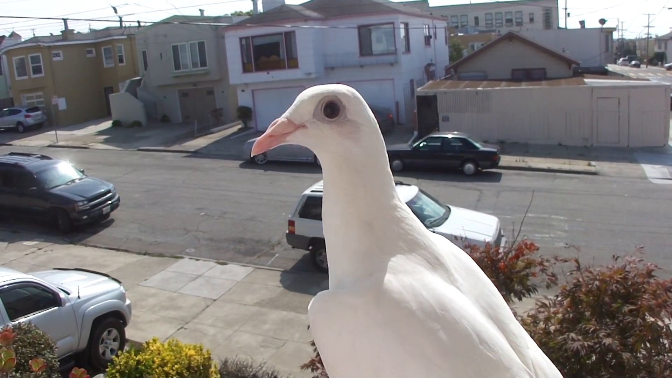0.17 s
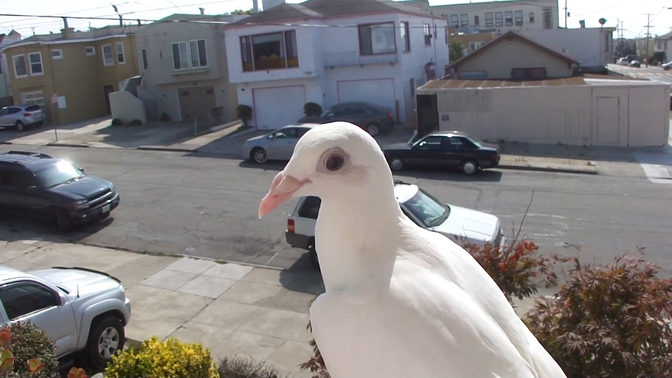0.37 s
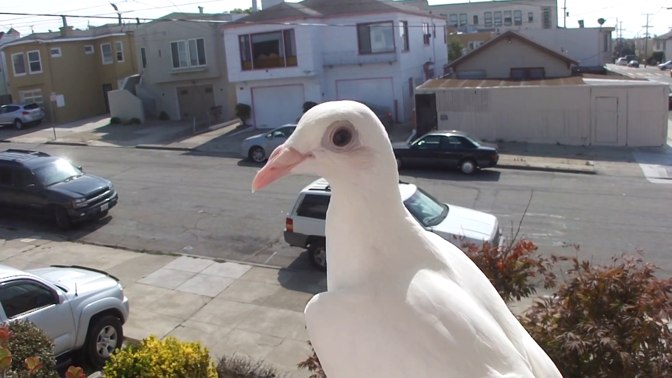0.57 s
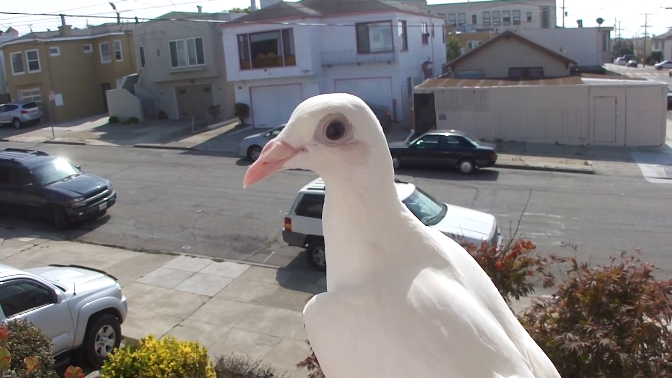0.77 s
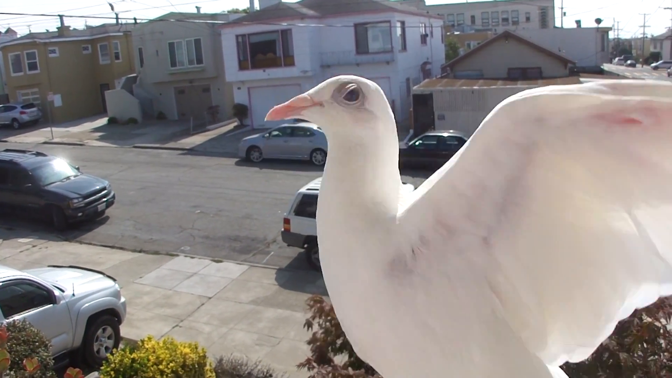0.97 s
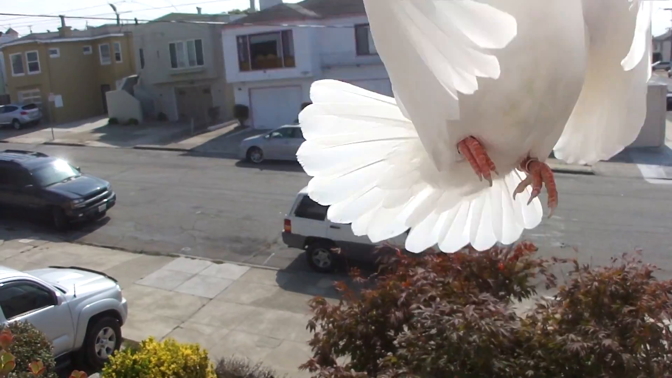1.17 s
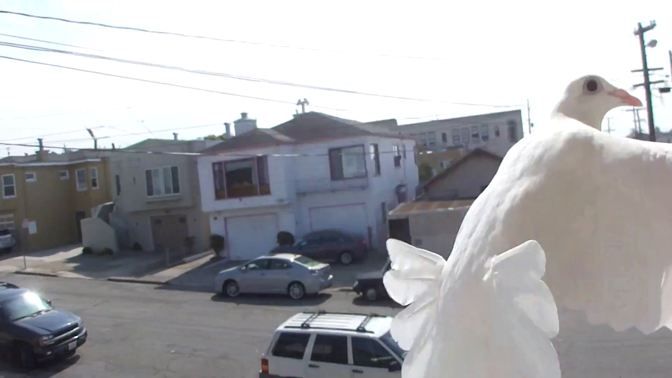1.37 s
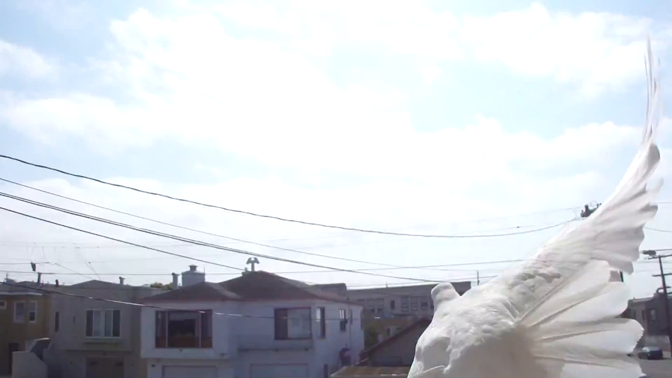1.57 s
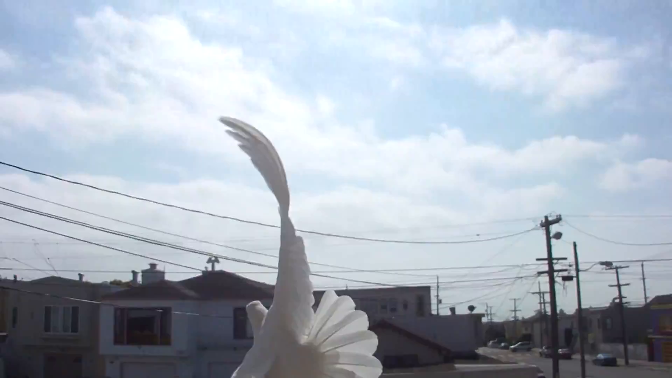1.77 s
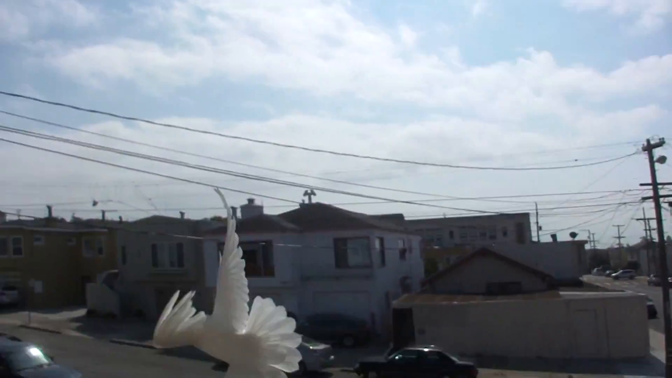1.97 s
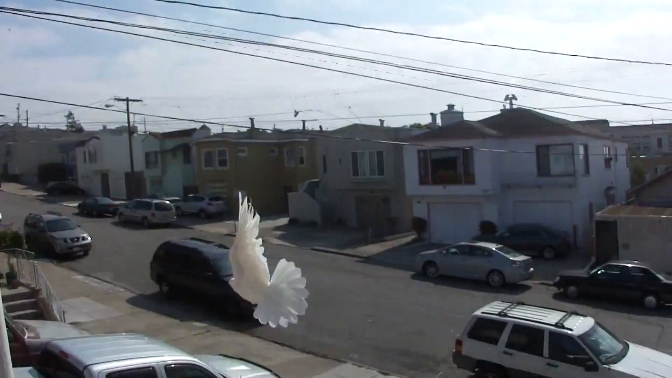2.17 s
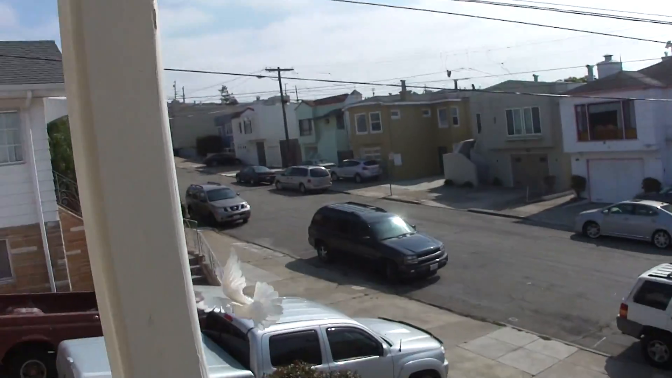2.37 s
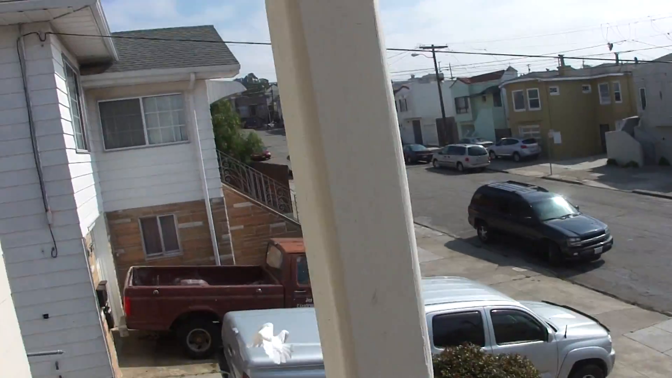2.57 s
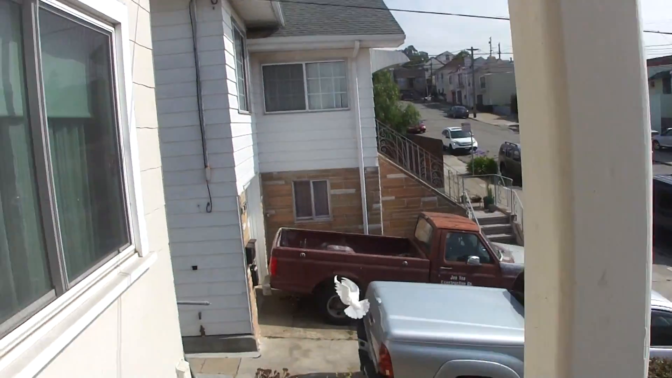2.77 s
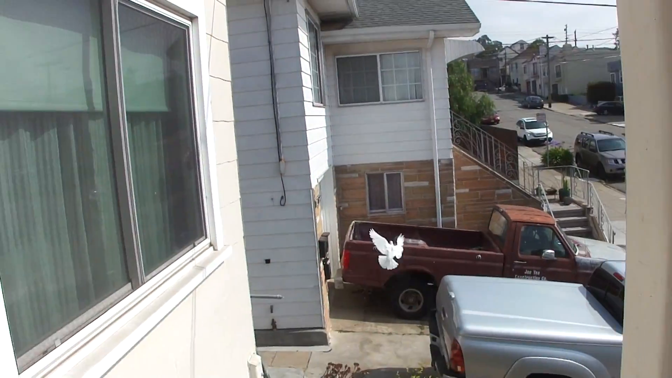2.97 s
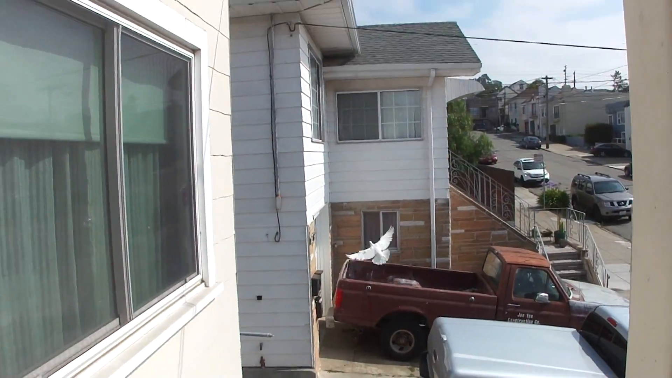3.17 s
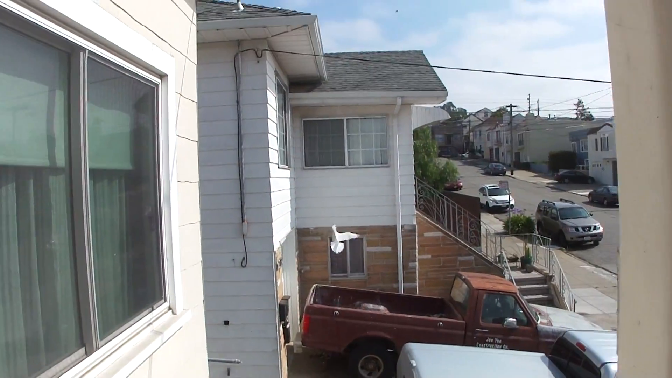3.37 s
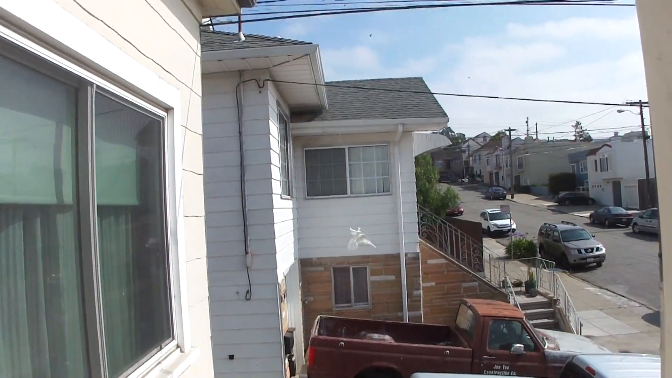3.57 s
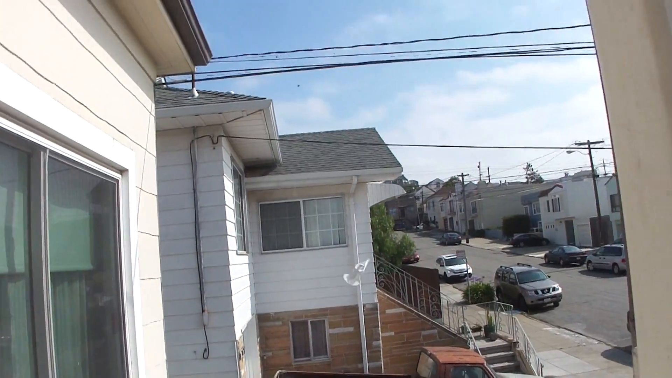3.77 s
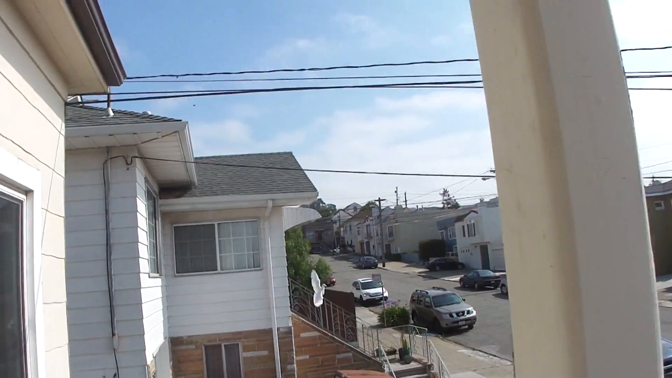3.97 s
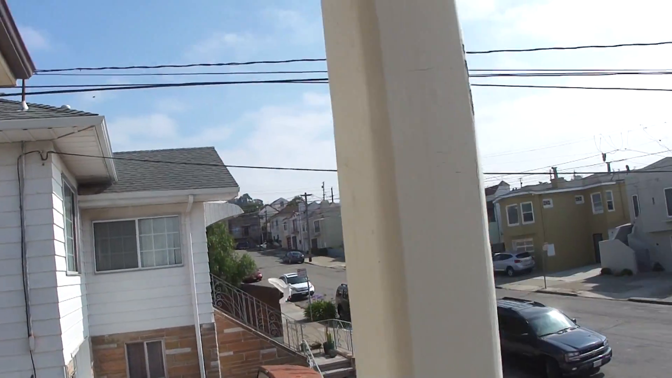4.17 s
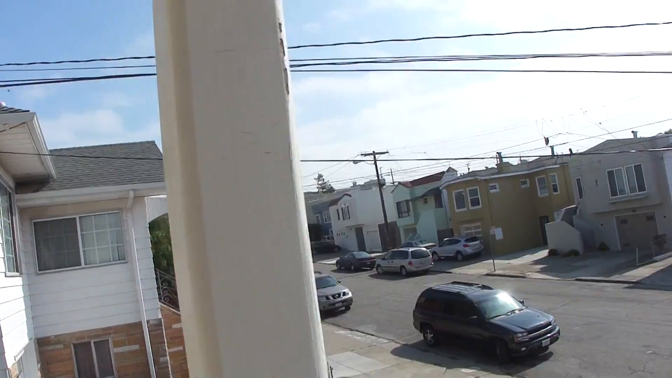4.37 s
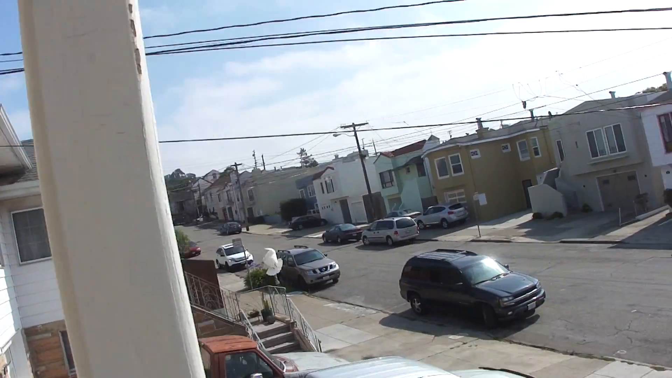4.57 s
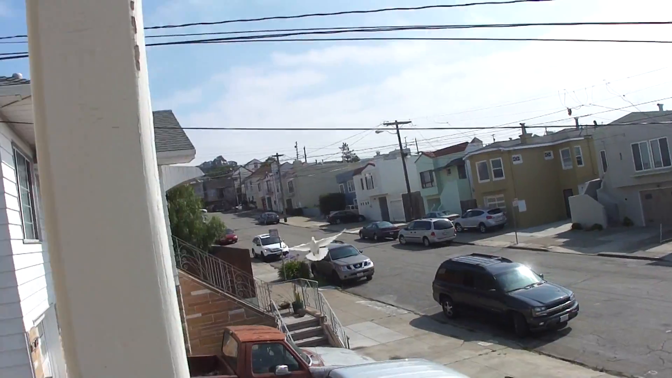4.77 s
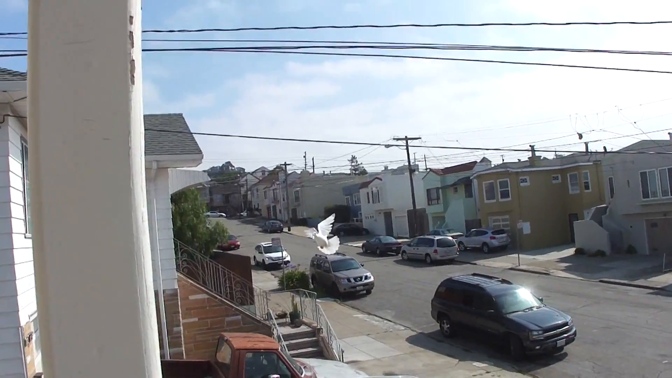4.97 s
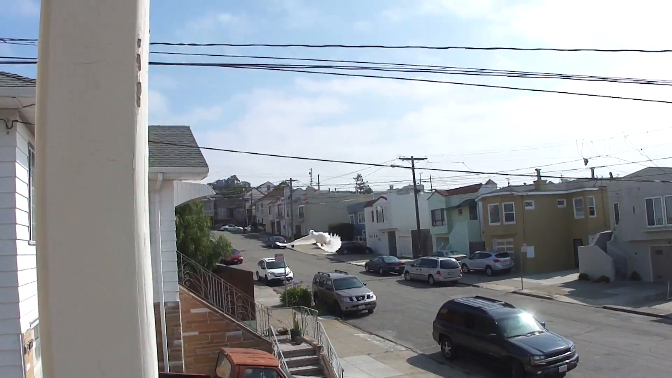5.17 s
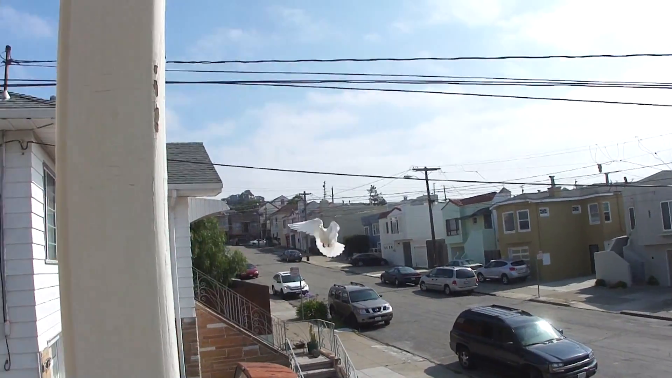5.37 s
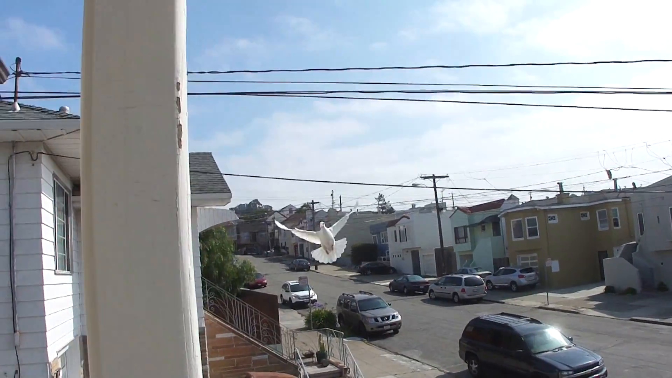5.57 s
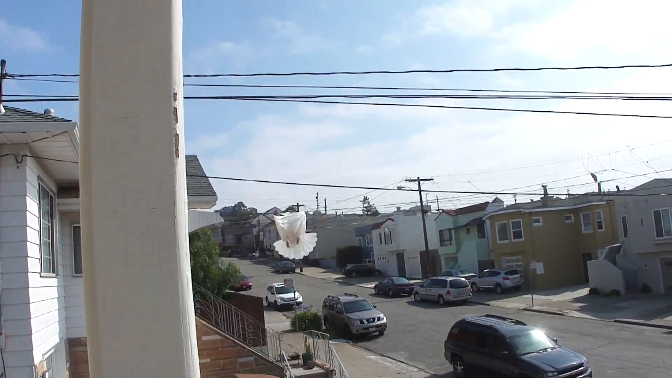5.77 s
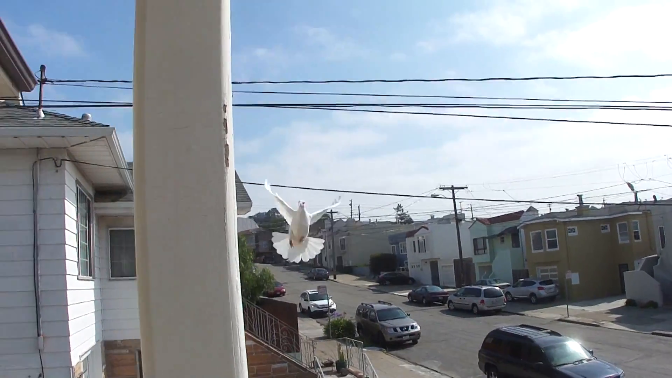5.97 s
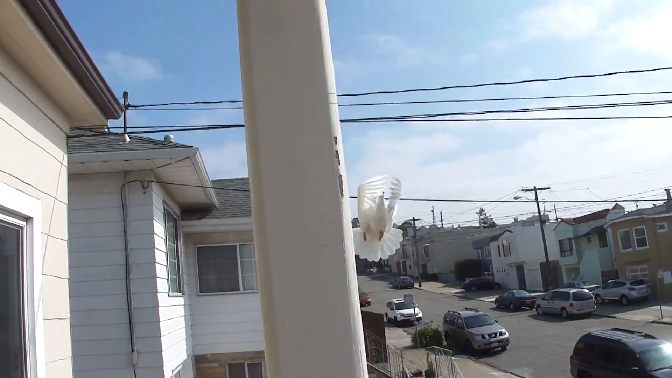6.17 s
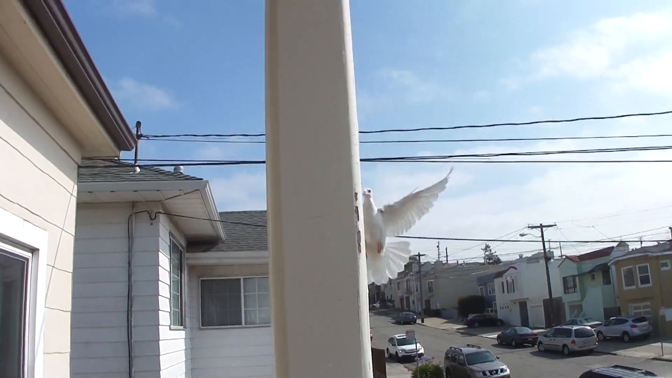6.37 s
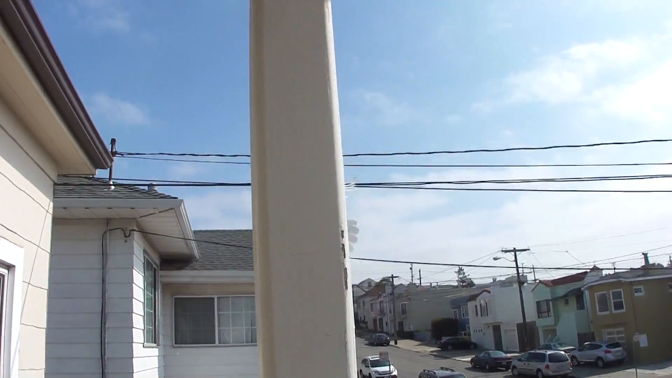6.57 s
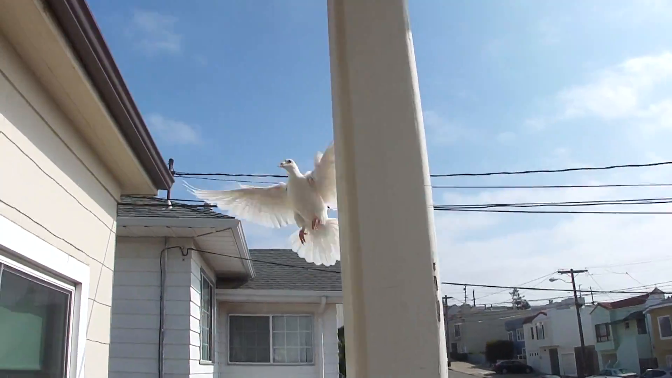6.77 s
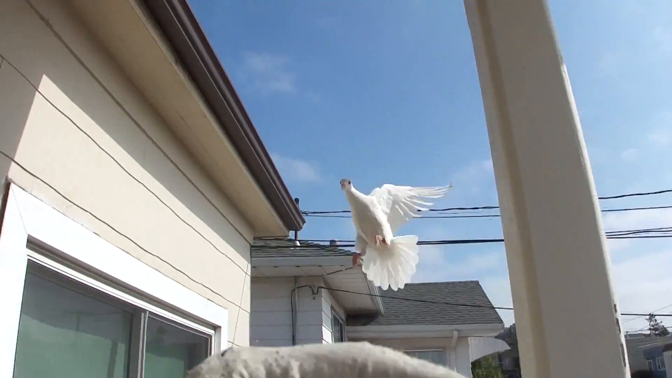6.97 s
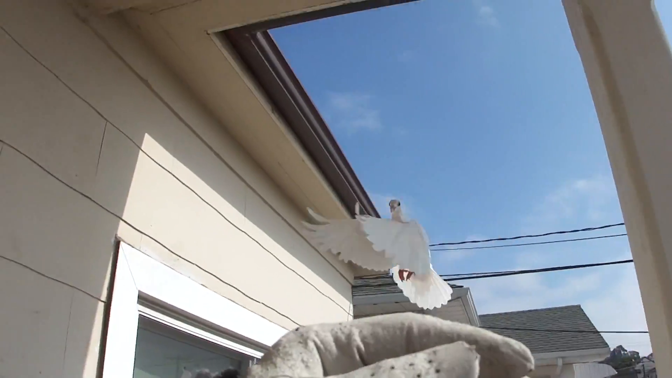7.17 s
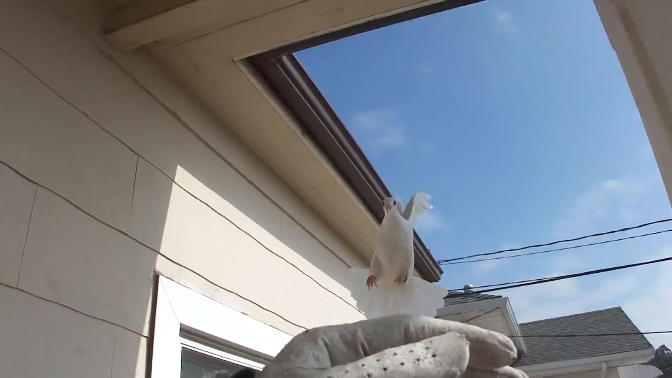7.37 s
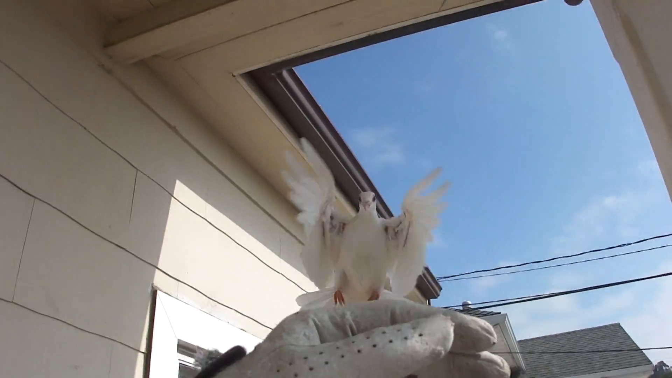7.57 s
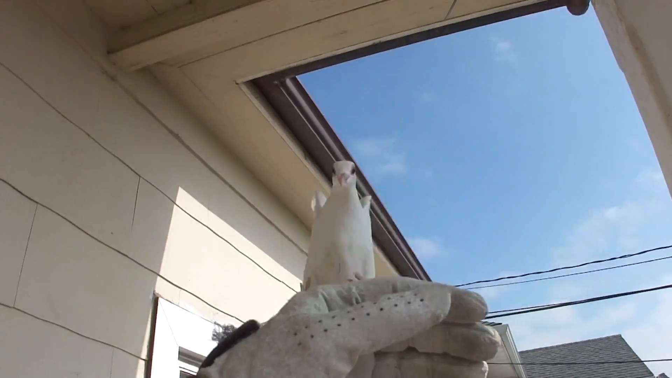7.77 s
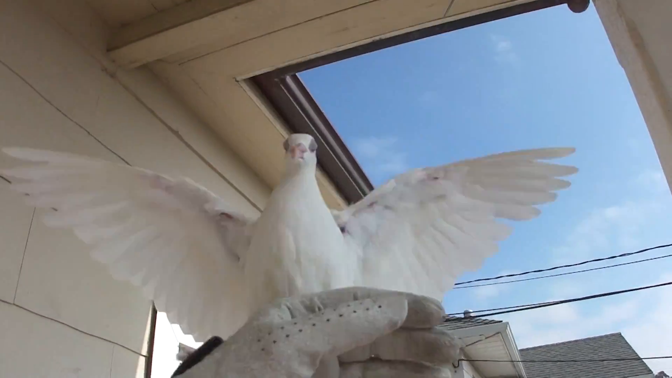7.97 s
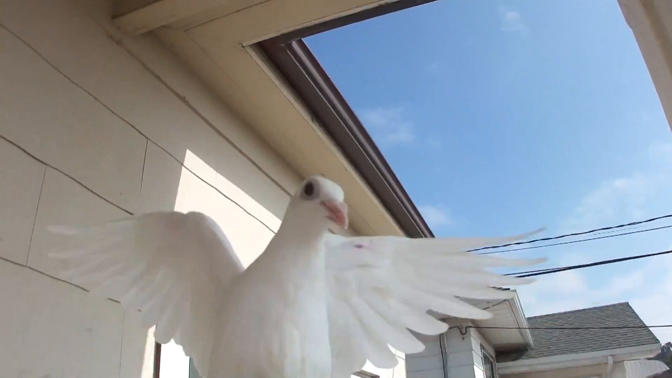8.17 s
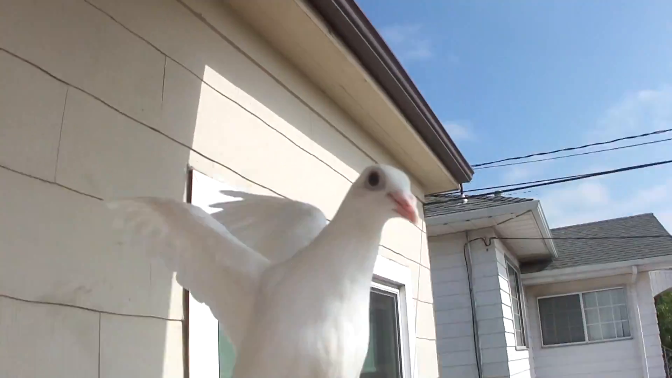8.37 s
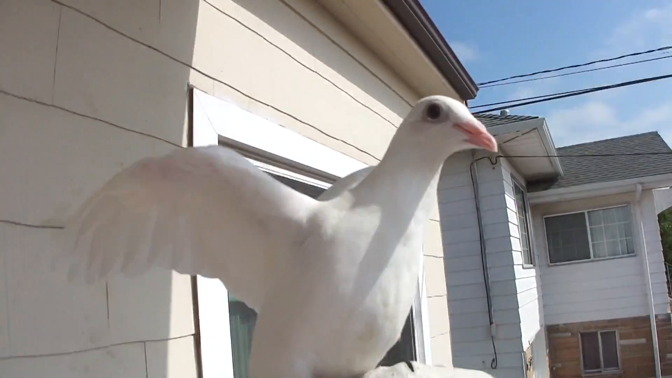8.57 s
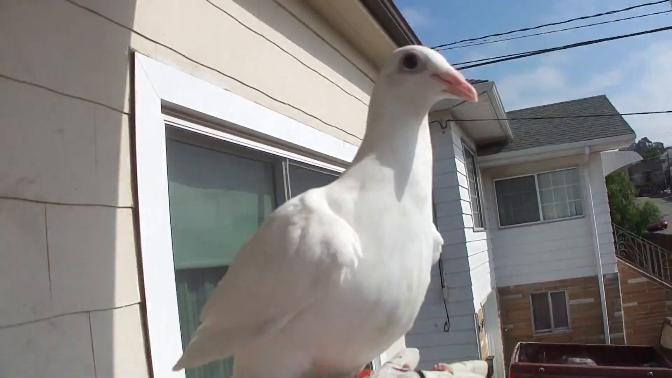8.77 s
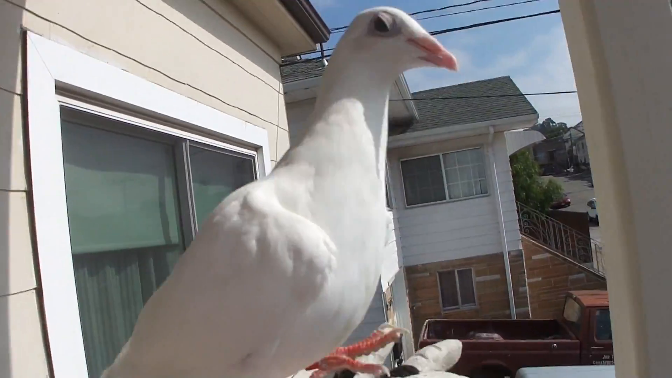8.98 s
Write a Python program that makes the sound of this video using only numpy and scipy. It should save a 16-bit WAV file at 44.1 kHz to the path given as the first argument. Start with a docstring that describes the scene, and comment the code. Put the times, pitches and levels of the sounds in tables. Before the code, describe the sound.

A dove takes off right at the microphone with sharp wing claps and rushing beats, fades over a quiet street, then flutters back to land.

```python
"""Dove taking off and landing

A pet dove takes off from a porch, right at the microphone, circles over a quiet street and flies back to a
gloved hand. The wings clap on the first beats: noise pops and cracks. Take-off and braking strokes are swells
of eddy noise with a low push and a fluttering feather tone; sliding feathers add grainy hiss. Downwash buffets
the microphone in noise puffs, a dull thud sounds, the house walls echo, far traffic murmurs as shaped noise,
and faint whines sound, one brief near the start."""
import sys
import numpy as np
from scipy import signal
from scipy.fft import rfft, irfft, next_fast_len
from scipy.io import wavfile
from scipy.ndimage import uniform_filter1d

SR = 44100
rng = np.random.default_rng(int(sys.argv[2]) if len(sys.argv) > 2 else 0)


def log_audio(samples):
    """Write samples as a 16-bit WAV file to the path given in sys.argv[1]."""
    # one column per channel
    frames = np.atleast_2d(samples).T
    # limit to full scale, then quantise
    limited = np.clip(frames, -1, 1)
    pcm = np.round(limited * 32767).astype(np.int16)
    wavfile.write(sys.argv[1], SR, pcm)


N = 398663
TIME = np.arange(N) / SR
CUTOFF_HZ = 16700
BRAKE_FROM_S, BRAKE_TO_S = 5.92, 7.95

# take-off and climb strokes: t/s, relative rush level/dB, relative low push level/dB, flutter f/Hz
TAKEOFF = [(1.068, -33, -39, 702), (1.146, -26.5, -30.5, 600), (1.23, -15, -22.5, 830),
           (1.322, -20, -29, 970), (1.386, -23, -24, 600), (1.432, -24, -33, 850),
           (1.491, -24.5, -21.5, 480), (1.539, -23.5, -42, 940), (1.6, -21.5, -19.5, 1040),
           (1.747, -21.5, -24, 1040), (1.816, -30, -27.5, 1050), (1.875, -28.5, -39, 950),
           (1.92, -25.5, -27.5, 1090), (1.962, -25, -34, 800), (2.036, -26.5, -35, 600),
           (2.157, -35, -45, 701), (2.229, -27, -34, 1000), (2.302, -31, -44, 860),
           (2.758, -36.5, -55, 880), (2.95, -38.5, -37.5, 600)]
# wingbeat, slowing from climb to circling to braking: first downstroke t/s, end t/s, beat rate/Hz
GAITS = [(1.142, 3.1, 10.06), (3.123, 5.56, 8.82), (5.584, 8.53, 7.764)]
# left-right likeness of the wings: f/Hz, likeness/0-1
WING_LIKENESS = [(100, 0.9), (700, 0.98), (2400, 0.88), (7000, 0.6), (15000, 0.3)]


def strokes(rows, slides):
    """Each stroke sheds a rush of eddies, a low push and a flutter; wake and folding feathers stir more air."""
    # rush spectrum: f/Hz, relative level/dB
    rush_spectrum = [(250, -21.5), (450, 1), (800, 3.5), (1200, 0), (1950, -2), (2450, -8.5), (3000, -26),
                     (4500, -26.5), (7000, -16), (15000, -44.5)]
    # push spectrum: f/Hz, relative level/dB
    push_spectrum = [(40, -38.5), (110, -9), (220, -3.5), (390, 6), (550, -1.5), (900, -25.5), (2000, -52)]
    s, half_s, rush_db, push_db, _, share = np.transpose(rows)
    airy_db = rush_db + 10 * np.log10(1 - np.clip(share, 0, .9))

    # the wake throbs with the downstroke and, more weakly, with the upstroke
    beat = beat_phase()
    throb_db = 2.7 * np.cos(beat) + 1.1 * np.cos(2 * beat)
    presence = presence_db(TIME)
    wake_db = -30.0 + 0.87 * (presence - presence.max())  # follows only a share of the presence
    stirred = from_db(2.0) * swells(*slides, lean=.5)
    wake = np.hypot(from_db(wake_db + throb_db), stirred)

    rush = np.hypot(swells(s, half_s, airy_db), from_db(2.0) * wake)
    push = np.hypot(swells(s, half_s, push_db, lean=0.32), from_db(-5.5) * wake)
    lumps = turbulence(rough_db=2, rate=200, likeness=WING_LIKENESS)
    air = from_db(-2.0) * colour(rush * eddies(patchy_db=3.5, rate=76), rush_spectrum)
    air += from_db(-0.5) * colour(push * lumps, push_spectrum)
    return air + flutter(rows, arch=.25, wobble=0.025, octave_db=-10.5, spread=0.914)


def takeoff_strokes():
    """Hard, uneven strokes; a louder stroke is faster, so shorter.

    Columns: t/s, half-length/s, rush/dB, push/dB, flutter f/Hz, flutter share.
    """
    half_s_at_0_db, halving_db, flutter_share = .0026, 12.5, .38
    s, rush_db, push_db, hz = np.transpose(TAKEOFF)
    half_s = half_s_at_0_db * 2 ** (-rush_db / halving_db)
    return np.column_stack(np.broadcast_arrays(s, half_s, rush_db, push_db, hz, flutter_share))


def braking_strokes():
    """Same columns for landing: one long stroke a beat, growing by 1/distance in even steps toward the hand."""
    # flutter pitch while braking: t/s, f/Hz
    pitch = [(6.2, 705), (6.296, 821.5), (7.35, 773), (7.394, 936), (7.466, 690.5), (7.828, 806.4),
             (7.95, 666)]
    far_m, near_m, db_at_1_m = 5.46, 1.14, -24
    half_s, push_re_rush_db, flutter_share = 0.021, -16.5, .6
    s = beat_times(count=1)
    s = s[(s > BRAKE_FROM_S) & (s < BRAKE_TO_S)]
    rush_db = db_at_1_m - 20 * np.log10(np.linspace(far_m, near_m, len(s)))
    hz, = along(pitch, s)
    push_db = rush_db + push_re_rush_db
    return np.column_stack(np.broadcast_arrays(s, half_s, rush_db, push_db, hz, flutter_share))


def flutter(rows, arch, wobble, octave_db, spread):
    """A flight feather buzzes mid-stroke; its pitch rises and falls with wing speed."""
    out, waver = np.zeros(N), drift(300)
    for (s, half_s, db, _, hz, share), start_cycles in zip(rows, rng.random(len(rows))):
        span = slice(int((s - 4 * half_s) * SR), int((s + 4 * half_s) * SR))
        speed = np.exp(-((TIME[span] - s) / (spread * half_s)) ** 2 / 2)
        pitch_hz = hz * (1 - arch * (1 - speed) + wobble * waver[span])
        phase = 2 * np.pi * (start_cycles + np.cumsum(pitch_hz) / SR)
        tone = np.sin(phase) + from_db(octave_db) * np.sin(2 * phase)
        out[span] += from_db(db) * np.sqrt(2 * np.clip(share, 0, 1)) * speed * tone
    return out * from_db(3.3 * drift(160) - 2.5)


def eddies(patchy_db, rate):
    """Turbulence whose bands swell independently, so that its colour keeps shifting."""
    white = [turbulence(rough_db=2.0, rate=530, likeness=WING_LIKENESS) for _ in range(2)]
    edges_hz = np.append(np.geomspace(200, 3200, 11), CUTOFF_HZ)
    out = 0
    for k, band_hz in enumerate(zip(edges_hz, edges_hz[1:])):
        sos = signal.butter(2, band_hz, "band", fs=SR, output="sos")
        swell = from_db(patchy_db * np.clip(drift(rate), -2, 2))
        out = out + signal.sosfilt(sos, white[k % 2]) * swell
    return rms_one(out)


def feathers(slides):
    """Barbs scrape over barbs: grainy hiss that swells twice a beat, as the wings fold and spread."""
    # feather spectrum: f/Hz, relative level/dB
    spectrum = [(1500, -19), (3000, -2), (4500, -11), (5700, 6), (6800, 6), (8500, 8), (10500, 1.5),
                (13000, -48), (15500, -0.5)]
    fold = np.cos(2 * beat_phase() + 2.2 * drift(3.8))
    plumage = from_db(presence_db(TIME) + 0.5 + 1.8 * fold + 1.33 * drift(60))
    swish = np.hypot(swells(*slides, lean=0.3), plumage)
    grain = turbulence(rough_db=3.0, rate=1800, likeness=WING_LIKENESS)
    return from_db(0.23) * colour(swish * grain, spectrum)


def swishes():
    """Feathers slide over each other twice a beat, and catch and flick free: t/s, half-length/s, level/dB."""
    # flicks: t/s, relative level/dB
    flicks = [(1.178, -34.5), (1.604, -29.5), (1.701, -35.5), (1.751, -31), (1.995, -33.5), (2.152, -39),
              (2.903, -46.5), (4.218, -46), (4.339, -47.5), (4.615, -49), (4.786, -47.5), (6.118, -49.5),
              (6.435, -41.5), (6.683, -41), (6.885, -41), (6.949, -40.5), (8.12, -46.5), (8.373, -47.5),
              (8.445, -49), (8.774, -48.5)]
    lag_s, swish_half_s, flick_half_s = .017, 0.0069, 0.0053
    swish_db, braking_db, scatter_db = 5.5, 2.5, 0.2  # fanned feathers swish more from braking on
    s = beat_times(count=2) + lag_s
    db = presence_db(s) + swish_db + braking_db * (s > BRAKE_FROM_S)
    db += scatter_db * rng.standard_normal(len(s))
    flick_s, flick_db = np.transpose(flicks)
    return np.hstack([np.broadcast_arrays(s, swish_half_s, db),
                      np.broadcast_arrays(flick_s, flick_half_s, flick_db)])


def presence_db(s):
    """Wing level by effort and nearness, falling away before the wings spread and after they fold."""
    # presence: t/s, relative level/dB
    presence = [(1.15, -53), (1.21, -46), (1.48, -40.5), (1.86, -45), (2.4, -57), (2.77, -56),
                (3.71, -70.5), (4.28, -58), (4.71, -59), (5.06, -70.5), (5.49, -76), (6.57, -55),
                (6.92, -57.5), (7.13, -50.5), (8.36, -63.5), (8.5, -60.5)]
    spread_s, spread_db_per_s = 1.062, 262
    fold_s, fold_db_per_s = 8.34, 33
    db, = along(presence, s)
    return db - spread_db_per_s * np.maximum(spread_s - s, 0) - fold_db_per_s * np.maximum(s - fold_s, 0)


def beat_phase():
    """Wing phase in radians, zero at each gait's first downstroke and every full turn after."""
    phase = np.zeros(N)
    for start_s, _, beats_per_s in GAITS:
        phase = np.where(TIME >= start_s, 2 * np.pi * beats_per_s * (TIME - start_s), phase)
    return phase


def beat_times(count):
    """Times that divide every wingbeat into count equal parts, from the downstroke on."""
    return np.concatenate([np.arange(start_s, end_s, 1 / (count * beats_per_s))
                           for start_s, end_s, beats_per_s in GAITS])


def claps():
    """The wings meet: trapped air pops out and the quills crack against each other."""
    # claps: t/s, half-length/s, relative level/dB
    wing_claps = [(1.082, .0025, -7), (1.297, .002, -17), (1.3235, .0012, -14), (1.3485, .0015, -15),
                  (1.4115, .0015, -12.5), (1.462, .003, -14), (1.516, .0025, -14), (1.621, .001, -20),
                  (1.726, .001, -21), (6.555, .005, -32), (7.078, .004, -29), (7.142, .004, -30),
                  (7.206, .004, -29), (7.866, .004, -32)]
    # pop spectrum: f/Hz, relative level/dB
    pop_spectrum = [(60, -25.5), (200, 1.5), (450, 4.5), (1200, 6.5), (2000, 4.5), (3000, -16), (5000, -34),
                    (12000, -60)]
    # crack spectrum: f/Hz, relative level/dB
    crack_spectrum = [(1500, -21.5), (3500, -14), (6500, 7.5), (9000, 4), (13000, -19.5), (15500, -9)]
    s, half_s, pop_db = np.transpose(wing_claps)
    # the crack lies below the pop and gains on it in hard claps
    hard_clap_db, crack_growth = -15.5, 0.53
    crack_db = pop_db - 9 + crack_growth * np.maximum(pop_db - hard_clap_db, 0)
    quills = stereo(*rng.choice([-1., 1.], (2, N)), WING_LIKENESS)
    pop = from_db(-3.5) * colour(swells(s, half_s, pop_db, lean=.5) * quills, pop_spectrum)
    crack = from_db(-2.5) * colour(swells(s, half_s, crack_db, lean=.4) * quills, crack_spectrum)
    # the near first clap's blast rakes the two ports in opposite senses
    blast = swells([1.0845], [.004], [-13], lean=.5) * rng.choice([-1., 1.], N) * [[1], [-1]]
    return pop + crack + colour(blast, pop_spectrum) + from_db(-3) * colour(blast, crack_spectrum)


def downwash():
    """Air pushes the microphone ports in mostly opposite senses; slower pressure bumps move both alike."""
    # later soft bumps: t/s, half-length/s, relative level/dB
    later_bumps = [(4.606, 0.026, -43), (4.969, 0.026, -33), (7.784, .012, -47), (7.92, .012, -48)]
    # puff spectrum: f/Hz, relative level/dB
    puff_spectrum = [(30, -17), (90, -0.5), (230, 7), (400, 4.5), (700, -18), (1500, -26.5), (5000, -52)]
    # bump spectrum: f/Hz, relative level/dB
    bump_spectrum = [(25, -31), (60, -5.5), (110, 2.5), (180, 3.5), (400, -44), (1500, -73.5)]
    lag_s, overhead_s, overhead_half_s = .011, 1.27, .2
    follows = .35  # share of a stroke's level variation in dB that its downwash keeps
    s, rush_db, _, _ = np.transpose(TAKEOFF)
    s = s + lag_s
    near_db = follows * (rush_db - rush_db.mean())
    near_db -= 20 * np.log10(1 + ((s - overhead_s) / overhead_half_s) ** 2)
    gusts = turbulence(rough_db=1.5, rate=150, likeness=[(100, -.75), (1000, -.7)])
    puffs = swells(s, .01, -14.0 + near_db, lean=0.43) * gusts
    bump_envelope = np.hypot(swells(s, .014, -25.0 + near_db), swells(*np.transpose(later_bumps)))
    bumps = bump_envelope * rng.standard_normal((1, N))
    return from_db(-5.0) * colour(puffs, puff_spectrum) + from_db(-9.0) * colour(bumps, bump_spectrum)


def thud():
    """A dull blow down the street: noise with a quick onset and exponential decay."""
    # thud spectrum: f/Hz, relative level/dB
    spectrum = [(50, -48), (220, -10), (330, 0), (750, -1.5), (1100, -9), (1800, -11), (2800, -33),
                (8000, -48), (14000, -70)]
    at_s, decay_s, onset_s, level_db = 2.618, .028, .002, -23.5
    age_s = np.maximum(TIME - at_s, 0)
    envelope = np.exp(-age_s / decay_s) * (1 - np.exp(-age_s / onset_s))
    noise = stereo(*rng.standard_normal((2, N)), WING_LIKENESS)
    return from_db(level_db) * colour(envelope * noise, spectrum)


def porch(x, tail_db, t60):
    """A few near reflections off porch and walls, and a short diffuse tail from the houses."""
    # reflections: delay/s, level/dB
    walls = [(.0045, -33.5), (0.0115, -20.5), (.030, -22.5)]
    age_s = TIME[:SR // 2]
    response = rng.standard_normal((2, len(age_s))) * from_db(-60 * age_s / t60) * (age_s > .008)
    response *= from_db(tail_db) / np.linalg.norm(response[0])
    for delay_s, db in walls:
        response[:, int(delay_s * SR)] += from_db(db)
    return x + signal.oaconvolve(x, response, axes=1)[:, :N]


def street():
    """Far traffic: a smooth murmur, engine rumble and the roar of tyres. Apart from it, faint whines sound, one
    brief near the start."""
    # murmur of the whole street: t/s, relative level/dB
    murmur = [(0, -46), (3.5, -45), (5.3, -42.5), (6.2, -45.5), (9, -46)]
    # murmur spectrum: f/Hz, relative level/dB
    murmur_spectrum = [(40, -30.5), (75, -25.5), (130, -4), (350, 1.5), (800, -1.5), (1300, -2), (1850, -6),
                       (2400, -14.5), (2900, -29), (4500, -33), (6000, -21.5), (11000, -31), (13000, -62.5),
                       (15500, -31.5)]
    # far engines: t/s, relative level/dB
    engines = [(0, -79), (1, -60), (3.5, -78), (4.6, -62.5), (6.2, -68.5), (8, -69)]
    # engine spectrum: f/Hz, relative level/dB
    rumble_spectrum = [(30, -19), (80, -22), (120, 4.5), (200, -1), (500, -46)]
    # tyres of far cars: t/s, relative level/dB, centre f/Hz
    tyres = [(0, -48.5, 1196), (1, -46.5, 1192), (3.5, -46, 900.7), (4.6, -44.5, 901), (5.4, -38, 850),
             (6.2, -48.5, 755.4), (8, -44.5, 507.3)]
    # whines: start t/s, end t/s, f/Hz, relative level/dB
    whines = [(0, 13, 7870, -75.5), (.18, .43, 6570, -73)]
    # left-right likeness: f/Hz, likeness/0-1
    likeness = [(60, 0.12), (290, 0.81), (1400, 0.54), (3100, 0.092), (7000, 0.031)]
    murmur_db, = along(murmur, TIME)
    rumble_db, = along(engines, TIME)
    tyre_db, tyre_hz = along(tyres, TIME)
    murmur_noise = turbulence(rough_db=0.13, rate=25, likeness=likeness)
    out = from_db(murmur_db) * colour(murmur_noise, murmur_spectrum)
    rumble_noise = stereo(*rng.standard_normal((2, N)), likeness)
    out += from_db(rumble_db) * colour(rumble_noise, rumble_spectrum)
    roar = [narrow_noise(tyre_hz, width_hz=384) for _ in range(2)]
    out += from_db(tyre_db - 7.5) * stereo(*roar, likeness)
    for start_s, end_s, hz, db in whines:
        gate = uniform_filter1d(1. * (TIME > start_s) * (TIME < end_s), size=1500)
        out += from_db(db) * narrow_noise(hz, width_hz=71) * gate
    return out


def from_db(db):
    """Decibels to gain."""
    return 10 ** (np.asarray(db) / 20)


def rms_one(x):
    """Scale to unit power."""
    return x / np.sqrt(np.mean(x ** 2) + 1e-20)


def at_hz(points, hz):
    """Read a spectrum on a log-frequency axis."""
    f, value = np.transpose(points)
    return np.interp(np.log(hz + 1), np.log(f), value)


def along(rows, s):
    """Read the columns of a curve at the given times."""
    knots, *columns = np.transpose(rows)
    return [np.interp(s, knots, column) for column in columns]


def colour(x, spectrum):
    """Causal (minimum-phase) filter with the given spectrum and unit power gain on white noise."""
    size = 4096
    gain = from_db(at_hz(spectrum, np.fft.rfftfreq(size, 1 / SR)))
    cepstrum = irfft(np.log(gain))
    # fold the cepstrum onto positive times
    cepstrum[1:size // 2] *= 2
    cepstrum[size // 2 + 1:] = 0
    response = irfft(np.exp(rfft(cepstrum)))
    return signal.oaconvolve(x, response[None] / np.linalg.norm(response))[:, :N]


def stereo(mid, side, likeness):
    """Two unrelated signals become left and right, alike by frequency."""
    size = next_fast_len(N, True)
    alike = np.clip(at_hz(likeness, np.fft.rfftfreq(size, 1 / SR)), -1, 1)
    common = np.sqrt(1 + alike) * rfft(mid, size)
    opposed = np.sqrt(1 - alike) * rfft(side, size) * [[1], [-1]]
    return irfft(common + opposed, size)[:, :N]


def drift(rate):
    """Random curve of spread 1, linear between knots placed rate times a second."""
    knots = rng.standard_normal(N // 8)
    return np.interp(TIME * rate, np.arange(len(knots)), knots) * np.sqrt(3 / 2)


def turbulence(rough_db, rate, likeness):
    """White stereo noise that comes in quick lumps."""
    noise = stereo(*rng.standard_normal((2, N)), likeness)
    return rms_one(noise * from_db(rough_db * np.clip(drift(rate), -2, 2)))


def swells(times_s, halves_s, levels_db, lean=0.0):
    """Envelope of bell-shaped swells, summed in power; lean > 0 rises fast and dies slowly."""
    power = np.zeros(N)
    lean = np.clip(lean, -.8, .8)
    for s, half_s, db in np.broadcast(times_s, halves_s, levels_db):
        span = slice(max(0, int((s - 8 * half_s) * SR)), int((s + 8 * half_s) * SR))
        u = (TIME[span] - s) / half_s
        u = u / (1 + lean * np.sign(u))
        power[span] += from_db(db) ** 2 / np.cosh(np.pi / 2 * u) ** 2 * 2 ** .5
    return np.sqrt(power)


def narrow_noise(hz, width_hz):
    """Noise in a narrow band around a steady or moving centre."""
    phase = 2 * np.pi * np.cumsum(hz * np.ones(N)) / SR
    low_pass = signal.butter(2, width_hz / 2, fs=SR, output="sos")
    slow = signal.sosfilt(low_pass, rng.standard_normal((2, N)))
    return rms_one(slow[0] * np.cos(phase) + slow[1] * np.sin(phase))


def scene():
    """Dove and street, a little to the right."""
    slides = swishes()
    rows = np.vstack([takeoff_strokes(), braking_strokes()])
    wings = strokes(rows, slides) + feathers(slides) + claps()
    sound = porch(wings + thud(), tail_db=-23.5, t60=0.43) + street() + downwash()
    return sound * from_db([[-.9], [.8]])


def record(dry, notch_width_hz=450, low_cut_hz=38):
    """Cut the deepest bass, notch the treble narrowly, clip peaks as in overload, and cut the top."""
    # notch centres: f/Hz
    notches_hz = [3000, 4010, 5010, 12050, 13500]
    dry = signal.sosfilt(signal.butter(2, low_cut_hz, "high", fs=SR, output="sos"), dry)
    for hz in notches_hz:
        dry = signal.lfilter(*signal.iirnotch(hz, hz / notch_width_hz, fs=SR), dry)
    top_cut = signal.cheby2(14, 60, CUTOFF_HZ, fs=SR, output="sos")
    return signal.sosfilt(top_cut, np.clip(dry, -.95, .95))


dry = scene()
out = record(dry)
log_audio(out)
```